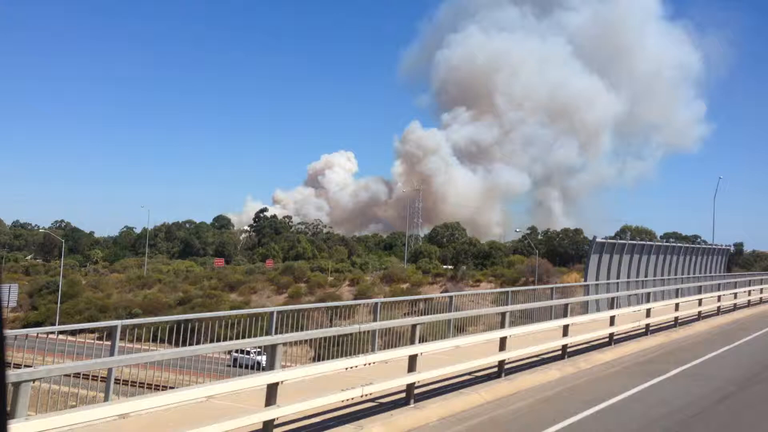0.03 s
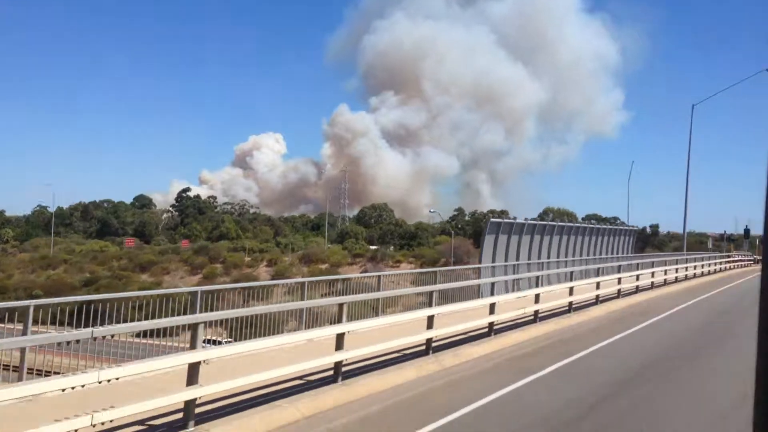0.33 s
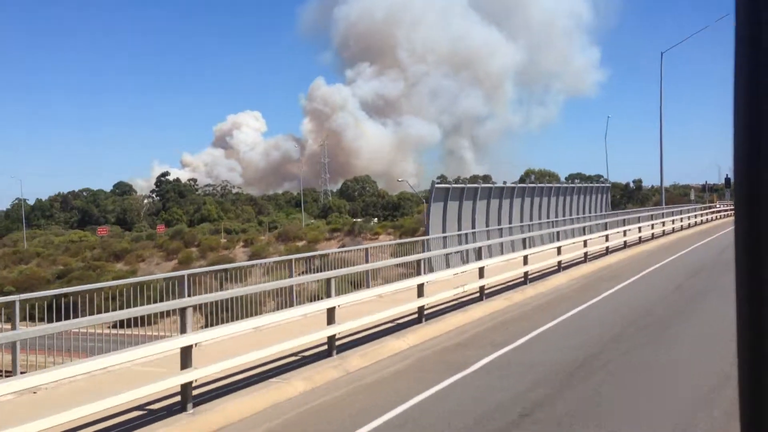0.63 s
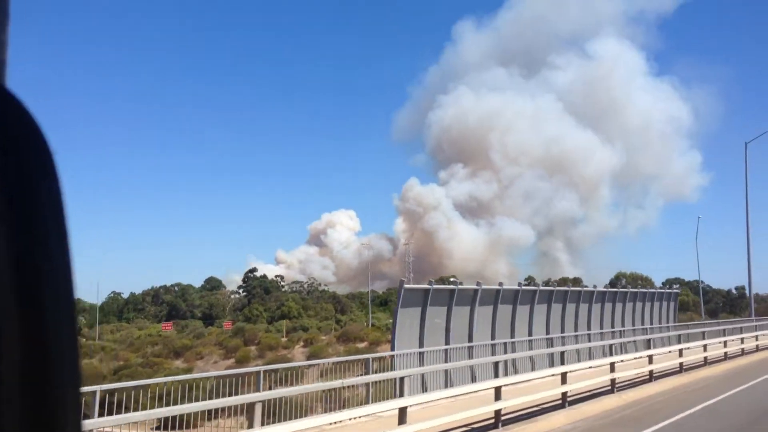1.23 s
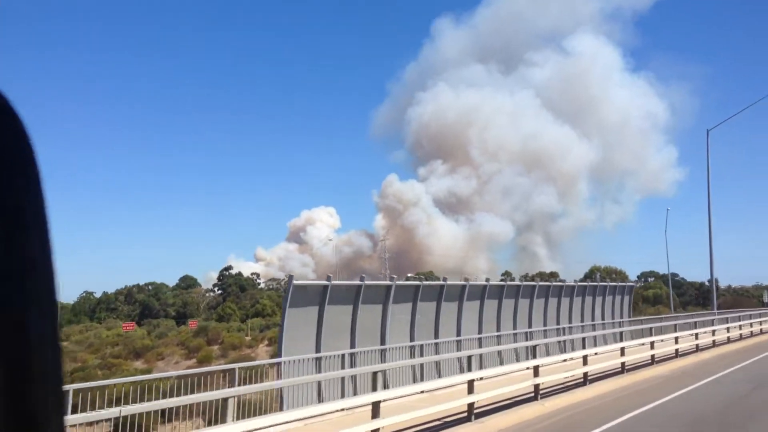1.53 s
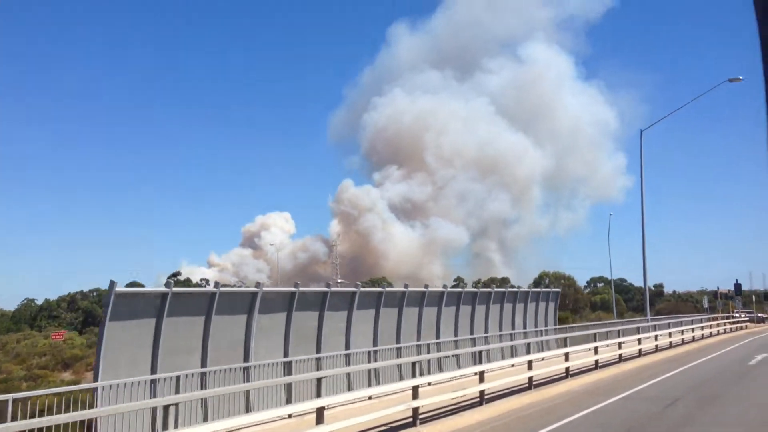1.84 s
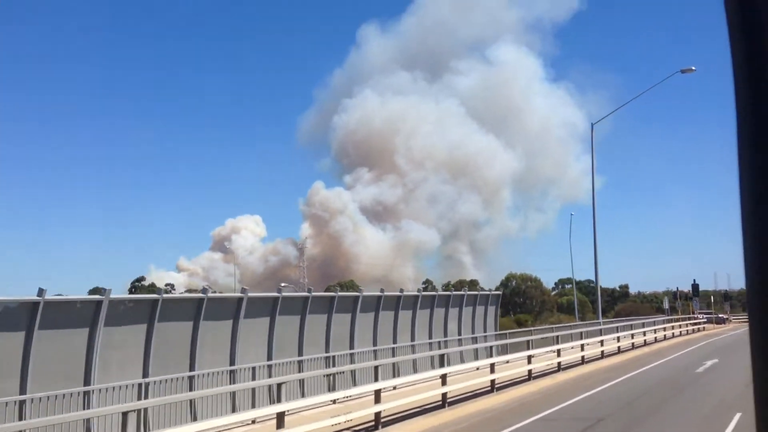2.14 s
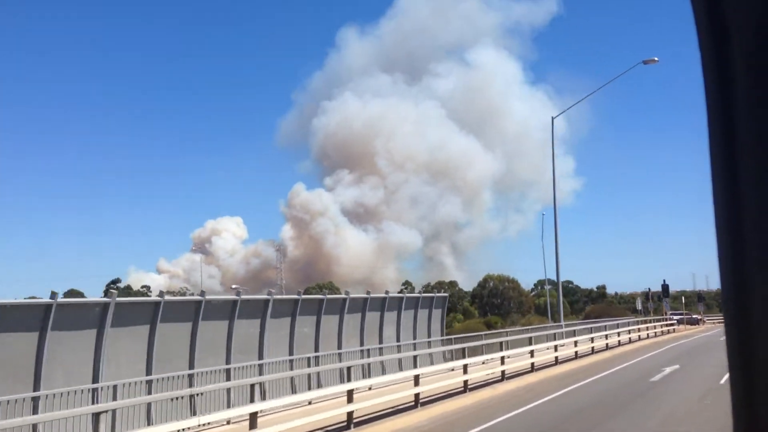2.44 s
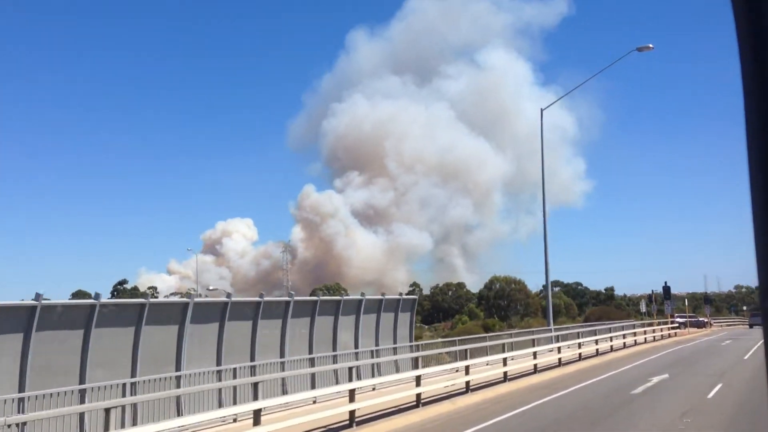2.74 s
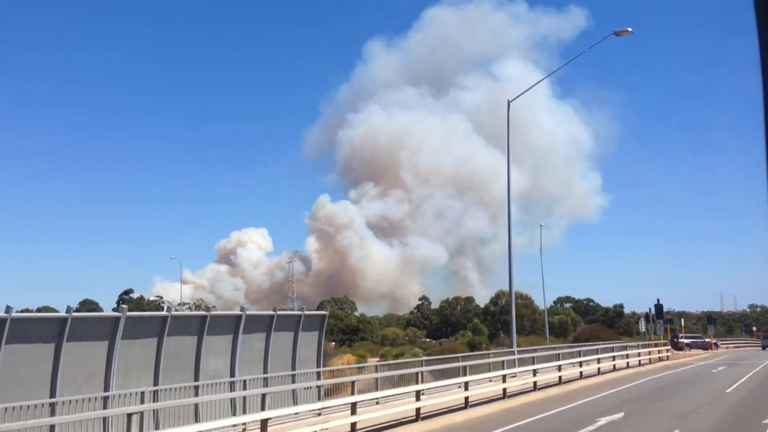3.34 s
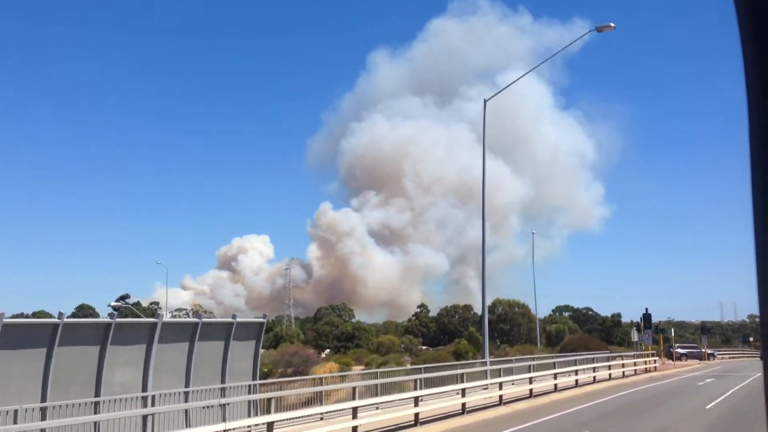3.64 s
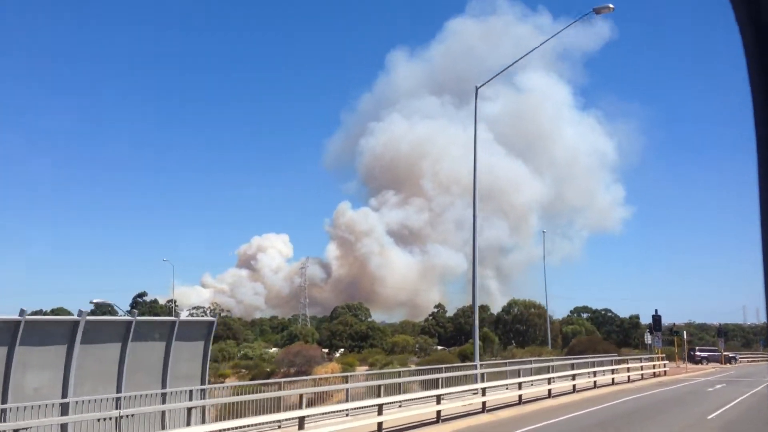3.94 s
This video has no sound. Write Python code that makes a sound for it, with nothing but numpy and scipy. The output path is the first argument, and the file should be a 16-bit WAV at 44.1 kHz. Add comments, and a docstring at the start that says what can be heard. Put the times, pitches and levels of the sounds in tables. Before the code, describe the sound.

Steady tyre roar in a car cabin as wind thumps through an open side window.

```python
"""Inside a car on a highway bridge, slowing gently with a side window open.
Tyre roar fills the cabin under a brighter rush from outside, and a low drivetrain hum sinks with the
speed. Air buffets the opening in eddies, hardest from 1 to 2 s, and rings breathily over the window
edge. The trim scuffs faintly, and a mid-low drone swells near 3 s."""
import sys
import numpy as np
from scipy import signal
from scipy.fft import rfft, irfft
from scipy.io import wavfile
from scipy.ndimage import uniform_filter1d, map_coordinates

SR = 44100
rng = np.random.default_rng(int(sys.argv[2]) if len(sys.argv) > 2 else 0)


def dump_mix(stems):
    """Bounce the given channels to the path in sys.argv[1] as a 16-bit WAV at rate SR."""
    frames = np.atleast_2d(stems).T  # one column per channel
    limited = np.clip(frames, -1, 1)  # hard clip at full scale
    pcm = np.round(limited * 32767).astype(np.int16)
    wavfile.write(sys.argv[1], SR, pcm)


N = 176400


def undb(db):
    """Decibels to gain."""
    return 10 ** (np.asarray(db) / 20)


def times():
    """Time of every sample in seconds."""
    return np.arange(N) / SR


def curve(table, column=1):
    """One column of a table, joined by straight lines in time."""
    rows = np.array(table)
    return np.interp(times(), rows[:, 0], rows[:, column])


def noise(spectrum):
    """Noise of rms 1, coloured by rows of frequency in Hz and relative level in dB."""
    hz, db = np.array(spectrum).T
    bins = np.maximum(np.arange(N // 2 + 1) * SR / N, 1)
    gain = undb(np.interp(np.log(bins), np.log(hz), db)) / (1 + (bins / (2 * hz[-1])) ** 2)
    y = irfft(rfft(rng.standard_normal(N)) * gain, N)
    return y / y.std()


def walk(rate):
    """Random levels held 1 / rate s and slewed; spread 1."""
    hold = max(int(SR / rate), 1)
    steps = rng.standard_normal(N)[np.arange(N) // hold]
    y = uniform_filter1d(uniform_filter1d(steps, hold), hold // 2 + 1)
    return (y - y.mean()) / y.std()


def even(y, window_s=.03):
    """The same noise with its chance swells ironed out."""
    return y / np.sqrt(uniform_filter1d(y ** 2, int(window_s * SR)) + 1e-9)


def tyre_roar(speed, level_db=-33.5, rough_db=1.6):
    """Tyres roar unevenly through the car's body and ease as it slows."""
    # Colour of the roar. Each row: frequency in Hz, relative level in dB.
    colour = [(20, -28.5), (40, -10.5), (65, -5.5), (120, 2.5), (200, -0.5), (260, -8.5), (303, -11),
              (345, -5.5), (410, -12.5), (520, -14), (620, -8.5), (750, -13.5), (830, -32.5), (1200, -54)]
    return even(noise(colour)) * undb(level_db + 26 * np.log10(speed) + rough_db * walk(8.1))


def outside_rush(flicker_db=1.13):
    """A brighter rush comes in from outside and falls back as the car slows."""
    # The rush with the cabin's resonances. Each row: frequency in Hz, relative level in dB.
    colour = [(400, -25.5), (650, -4.5), (750, 7), (830, 3.5), (990, 4.5), (1120, -1.5), (1280, 0.5),
              (1420, -5.5), (1530, -4), (1700, -0.5), (1830, -7.5), (1970, -12), (2160, -13), (2330, -11),
              (2440, -15), (2560, -24), (2720, -23), (3000, -19.5), (3260, -25), (3850, -19.5), (4400, -29),
              (5500, -36.5), (9000, -45)]
    # Fader ride of the rush. Each row: time in seconds, level in dB.
    ride = [(.12, -44), (.55, -43.5), (1.1, -44.8), (1.8, -44.5), (2.2, -45.5), (2.9, -48), (3.45, -48.5),
            (3.7, -47.5), (4, -47.5)]
    return noise(colour) * undb(curve(ride) + flicker_db * walk(35))


def drone():
    """A mid-low band of noise sits under the roar, then swells twice from about 3 s."""
    # Colour of the drone. Each row: frequency in Hz, relative level in dB.
    colour = [(120, -19), (210, 1), (265, -1.5), (300, -0.5), (340, -1), (380, -7), (430, -11),
              (900, -52.5)]
    # Fader ride of the drone. Each row: time in seconds, level in dB.
    ride = [(.12, -44), (2.9, -45), (3.02, -36), (3.13, -34.5), (3.21, -48), (3.32, -37.5), (3.55, -41),
            (4, -44.5)]
    return even(noise(colour)) * undb(curve(ride))


def drivetrain(speed, start_hz=134.5, wander=.0056, whine_ratio=34.8, whine_db=-82):
    """A hum, its octave and a faint gear whine sink with the speed and swell at cabin resonances."""
    # Swells of the hum. Each row: time in seconds, fundamental in dB, octave in dB.
    swells = [(.12, -41.5, -59), (.5, -33, -48), (.8, -30.5, -52.5), (1.1, -34, -50), (2.4, -34, -42.5),
              (2.85, -41, -44.5), (3.05, -43, -39), (3.5, -38.5, -40.5), (4, -47, -41.5)]
    hz = start_hz * speed * (1 + wander * walk(7.2))
    phase = 2 * np.pi * np.cumsum(hz) / SR
    hum = sum(undb(curve(swells, column=k)) * np.sin(k * phase) for k in (1, 2))
    # The whine carries only within about 290 Hz of a resonance at 4080 Hz.
    resonance = 1 / np.sqrt(1 + ((whine_ratio * hz - 4080) / 290) ** 4)
    whine_gain = resonance * undb(whine_db + 4 * walk(12))
    whine = whine_gain * np.sin(whine_ratio * phase + 1.1 * walk(60))
    return np.sqrt(2) * (hum + whine)


def window_wind(attack_s=.011, release_s=.013, flutter_hz=440):
    """Eddies at the window make deep thumps, cabin boom, hollow flutter and thin hiss."""
    # Strength of the wind. Each row: time in seconds, relative strength in dB.
    ride = [(.12, -17), (.32, -2), (.6, -5), (.8, -3.5), (1.08, -4.5), (1.3, 0), (1.45, 1.5), (1.7, 0.5),
            (1.85, -2), (2.15, -3), (2.3, -6.5), (2.75, -7.5), (2.95, -11.5), (3.08, -15.5), (3.65, -10.5),
            (4, -13.5)]
    # Single buffets. Each row: peak time in seconds, hold in seconds, thump in dB, boom in dB,
    # flutter in dB, flutter centre in Hz.
    gusts = [(.198, 0.007, -46, -22.5, -29, 479.5), (.23, .017, -28, -23, -36, 458.2),
             (.34, 0.0065, -26, -27.5, -50, 441.5), (.42, 0.012, -26.5, -46, -53, 438.7),
             (.89, .021, -24.5, -23, -25.5, 420), (.951, .012, -20.5, -30, -36, 401.2),
             (1.033, 0.0059, -31, -25.5, -32.5, 587.5), (1.104, 0.0058, -37, -43, -33, 581.6),
             (1.132, .016, -17.5, -30, -38, 481.2), (1.232, 0.033, -18, -22, -29.5, 419.3),
             (1.329, 0.0093, -17, -28, -27, 431.2), (1.398, 0.0067, -22, -23.5, -35, 400.8),
             (1.472, 0.013, -26, -22, -32, 459.5), (1.583, 0.0071, -28, -17.5, -54, 400),
             (1.635, 0.012, -31, -23.5, -29, 471), (1.726, 0.021, -28, -32.5, -24, 439.8),
             (1.78, 0.011, -19.5, -36, -50, 438), (1.864, .014, -18, -20.5, -35.5, 418),
             (1.928, 0.0073, -26, -25, -32, 422), (1.992, 0.0092, -27, -32, -34, 458.7),
             (2.052, 0.021, -21, -24.5, -40, 460), (2.116, 0.0095, -31, -23.5, -32, 520),
             (2.52, .008, -32.5, -25, -39, 397.5), (2.678, 0.0061, -32, -27, -39, 441.8),
             (2.77, 0.02, -27, -27.5, -39, 440), (2.85, .008, -26.5, -30, -48, 440),
             (2.915, 0.048, -30.5, -53, -53, 440.3), (3.555, 0.011, -29, -28.5, -56, 440),
             (3.695, 0.017, -25, -34, -52, 439.5)]
    # Colours of the four layers. Each row: frequency in Hz, relative level in dB.
    thump_colour = [(15, -35), (28, -15), (39, -1), (48, -0.5), (62, 6), (100, 1.5), (140, -3.5),
                    (200, -17), (300, -31), (1000, -49), (3000, -88)]
    boom_colour = [(60, -37), (115, -9), (160, 3), (205, -2.5), (260, -11), (330, -26.5), (700, -34),
                   (2000, -66)]
    flutter_colour = [(120, -36.5), (250, 6), (340, 0.5), (440, 8), (540, 0.5), (680, -11.5), (850, -22.5),
                      (1500, -24.5), (4000, -67.5)]
    hiss_colour = [(600, -18), (1300, 5.5), (1800, -10.5), (2100, 0), (2450, -13), (2800, -3), (3800, -17),
                   (4500, -22), (6000, -42.5), (9000, -51)]
    t, strength = times(), curve(ride)
    eddies_db = walk(22)
    thump_db = -27.5 + strength + eddies_db
    boom_db = -35 + .5 * strength + eddies_db
    flutter_db = -39 + 1.55 * strength + 3.5 * walk(38)
    powers = undb([thump_db, boom_db, flutter_db]) ** 2
    for peak, hold, *levels_db, _ in gusts:
        attack = np.clip((t - peak) / attack_s + 1, 0, 1)
        release = np.exp(-np.maximum(t - peak - hold, 0) / release_s)
        powers += np.outer(undb(levels_db), attack * release) ** 2
    hiss = noise(hiss_colour) * undb(-68.5 + .74 * strength + 2.5 * walk(40))
    # Varispeed glides the flutter's pitch from one buffet to the next.
    playhead = np.cumsum(curve(gusts, column=5) / flutter_hz)
    flutter = map_coordinates(noise(flutter_colour), [playhead], mode="wrap")
    layers = noise(thump_colour), noise(boom_colour), flutter
    return hiss + sum(np.sqrt(power) * even(layer) for power, layer in zip(powers, layers))


def window_gap(speed, drift=.008, flutter_db=2.2):
    """Air over the window edge sounds breathy resonances that drift, flutter and ease with the speed."""
    # Resonances of the gap. Each row: centre in Hz, width in Hz, level in dB at the starting speed.
    rings = [(1392, 170, -57), (1818, 170, -58), (2465, 230, -62.5)]
    out = 0
    for hz, width, db in rings:
        phase = 2 * np.pi * np.cumsum(hz * (1 + drift * walk(6))) / SR
        ring = walk(1.5 * width) * np.sin(phase) + walk(1.5 * width) * np.cos(phase)
        out = out + ring * undb(db + 24 * np.log10(speed) + flutter_db * walk(32))
    return out


def trim_scuffs(decay_s=.016):
    """The interior trim scuffs in faint, short bursts."""
    # Colour of a scuff. Each row: frequency in Hz, relative level in dB.
    colour = [(600, -22), (1700, -4), (2400, 15), (3100, -7), (3900, -7), (5000, -25), (9000, -40)]
    # The scuffs. Each row: start in seconds, level in dB, hold in seconds.
    scuffs = [(.225, -55.5, .035), (.43, -56, .02), (.5, -55, .06), (.915, -58, 0.022),
              (2.421, -54.5, 0.018), (2.639, -57, .006), (3.245, -59, .014), (3.585, -55, 0.0096),
              (3.915, -58.5, 0.013)]
    t = times()
    envelope = sum(undb(db) * (t >= start) * np.exp(-np.maximum(t - start - hold, 0) / decay_s)
                   for start, db, hold in scuffs)
    return noise(colour) * envelope


def scene(slowing_per_s=.066):
    """The mono mix from the passenger seat."""
    speed = 1 - slowing_per_s * times()  # share of the starting speed
    bed = tyre_roar(speed) + outside_rush() + drone() + drivetrain(speed)
    return (bed + window_wind() + window_gap(speed) + trim_scuffs())[None]


def record(dry):
    """The phone adds its own hiss, opens after a moment with a short fade and cuts the top; the sound fades out
    briefly at the very end."""
    start_s, fade_s, hiss_db, top_hz = .119, .004, -69, 15250
    t = times()
    hiss = undb(hiss_db) * rng.standard_normal(N)
    gate = np.clip(np.minimum(t - start_s, t[-1] - t) / fade_s, 0, 1)
    lowpass = signal.ellip(10, .1, 80, top_hz, fs=SR, output="sos")
    return signal.sosfilt(lowpass, (dry + hiss) * gate)


dry = scene()
out = record(dry)
dump_mix(out)
```